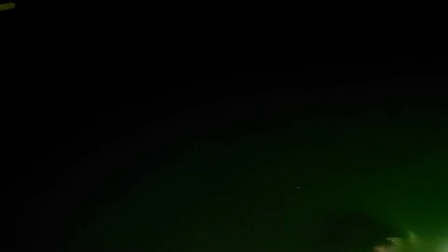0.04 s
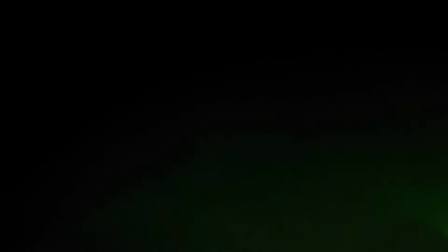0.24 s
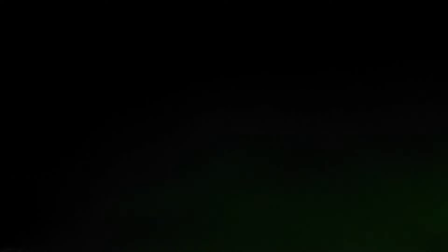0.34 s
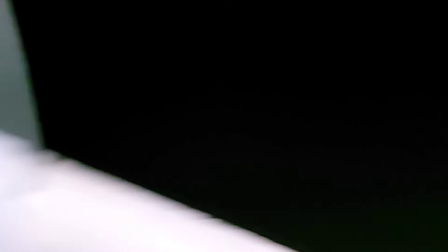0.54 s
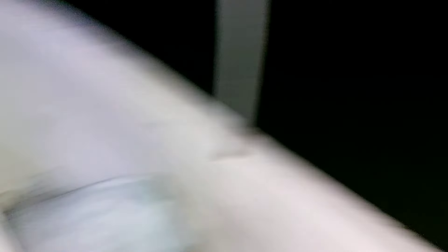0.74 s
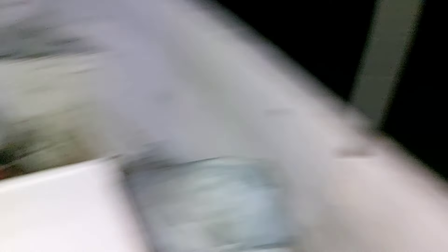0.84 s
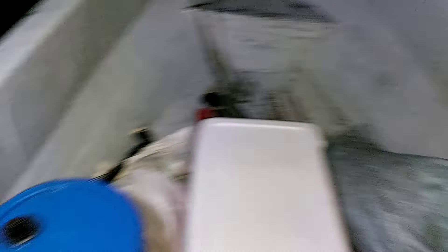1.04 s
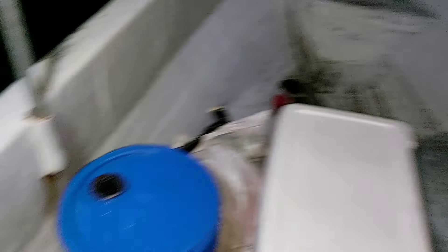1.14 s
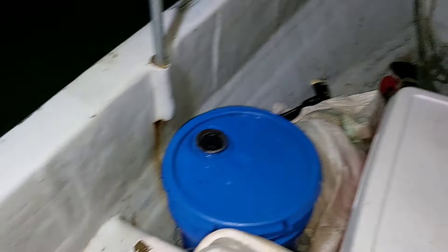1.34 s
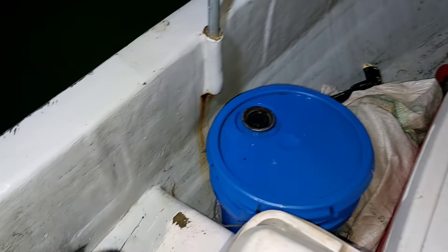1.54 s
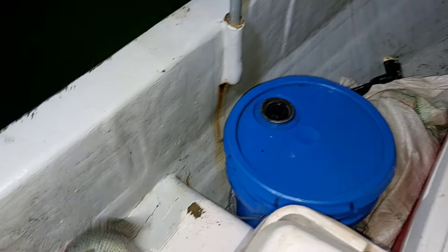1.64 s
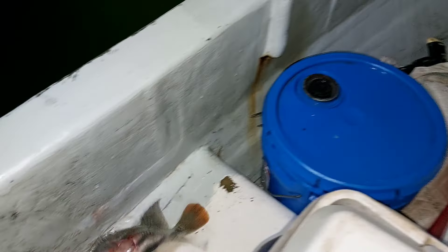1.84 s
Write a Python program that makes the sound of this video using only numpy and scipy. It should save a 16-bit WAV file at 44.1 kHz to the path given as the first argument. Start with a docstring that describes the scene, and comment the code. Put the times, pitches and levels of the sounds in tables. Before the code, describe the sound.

Close, dry sound of a fish thrashing in a small hollow boat at night; sharp wet smacks, heavy low knocks and tiny pops come first, then softer scattered flops with short resonant tails.

```python
"""On the floor of a small fibreglass boat at night, a freshly caught fish flops under a faint bed of air noise.
Wet slaps and scrapes are shaped noise: a crackle, a snap and a short tail off the hard sides of the boat.
Heavier blows excite decaying hull modes; low bands of noise give the rumble of the flexing deck.
Air trapped under the wet skin pops as brief damped sine tones."""
import sys
import numpy as np
from scipy import signal
from scipy.fft import rfft, irfft
from scipy.io import wavfile
from scipy.ndimage import uniform_filter1d, minimum_filter1d

SR = 44100
rng = np.random.default_rng(int(sys.argv[2]) if len(sys.argv) > 2 else 0)


def to_wav(s):
    """Save 16-bit WAV."""
    ch = np.atleast_2d(s).T  # columns
    pcm = np.round(np.clip(ch, -1, 1) * 32767)  # PCM
    wavfile.write(sys.argv[1], SR, pcm.astype(np.int16))


N = 83790  # length in samples


def amp(db):
    """Decibel law: converts a level to an amplitude gain."""
    return 10 ** (np.asarray(db) / 20)


def unit(x):
    """Normalisation: scales to a root-mean-square value of 1."""
    return x / np.sqrt(np.mean(x ** 2) + 1e-20)


def read(points, hz):
    """Interpolation: reads (frequency, value) points along a log-frequency axis."""
    point_hz, value = np.transpose(list(points))
    return np.interp(np.log(hz + 1), np.log(point_hz + 1), value)


def add(mix, start_s, sound):
    """Superposition: adds a stereo sound to the mix at its start time."""
    part = mix[:, max(round(start_s * SR), 0):][:, :sound.shape[1]]
    part += sound[:, :part.shape[1]]


def noise(points, likeness, size, tone=((100, 0), (1000, 0))):
    """Partial correlation: stereo noise of a given spectrum, set to rms 1 and then shaded by tone (Hz, dB)."""
    first, second = rng.standard_normal((2, size))
    likeness = np.clip(likeness, -1, 1)
    hz = np.fft.rfftfreq(size, 1 / SR)
    gain = unit(amp(read(points, hz))) * amp(read(tone, hz))
    partly_alike = likeness * first + np.sqrt(1 - likeness ** 2) * second
    return irfft(rfft([first, partly_alike]) * gain, size)


# spectrum of the quiet night on the water: pitch_hz [Hz], level_db [relative dB per Hz]
AIR_SPECTRUM = [(20, -5), (70, 13.5), (200, 8.5), (400, 5), (800, -7.5), (2000, -16.5), (12000, -22.5),
                (16000, -18)]
AIR_DB = -51


def night_air():
    """Broadband noise: a steady, partly correlated background."""
    return amp(AIR_DB) * noise(AIR_SPECTRUM, 0.62, N)


# the whole weight of the fish lands and the deck flexes: start_s [s], level_db [relative dB]
DECK_FLEXES = [(0.271, -26), (0.354, -26.5), (0.656, -31), (.945, -29.5), (1.2, -37), (1.562, -40)]
FLEX_RISE_S, FLEX_T60_S, FLEX_HZ, FLEX_WIDTH_HZ = 0.031, 0.76, 84.2, 15.6


def flex(level_db):
    """Narrow-band excitation: the deck gives under the fish with a dull, decaying rumble."""
    t = np.arange(SR // 2) / SR
    hz = np.fft.rfftfreq(len(t), 1 / SR)
    band = np.exp(-.5 * ((hz - FLEX_HZ) / FLEX_WIDTH_HZ) ** 2)
    rumble = unit(irfft(rfft(rng.standard_normal(len(t))) * band, len(t)))
    envelope = np.minimum(t / FLEX_RISE_S, 1) * amp(level_db - 60 * t / FLEX_T60_S)
    return np.tile(rumble * envelope, (2, 1))


# blows on the hull, with the excitation of its modes by frequency region:
# start_s [s], near_120_hz_db, near_250_hz_db, near_450_hz_db, near_800_hz_db [relative dB]
HULL_BLOWS = [ (0.178, -42, -39, -30.5, -63), (.207, -48, -32.5, -15, -10), (0.245, -18, -36, -26, -14),
              (0.277, -21, -29.5, -17, -15), (0.343, -8, -10.5, 7, -9), (0.364, -7, -23, -3.5, -28.5),
              (.386, -15, -14, -34, -52), (0.422, -13, -18, -66, -68), (.533, -54, -31, -23.5, -8),
              (0.573, -22, -32, -21.5, -61), (0.627, 5, -19.5, -21, -13), (.668, -8, -23, -30, -17),
              (0.704, -18, -28.5, -21.5, -44), (0.774, -19, -29, -32, -45), (.820, -31, -32, -16, -15),
              (0.9484, -15.5, -18.5, -20.5, -15), (1.036, -16.5, -14, -3.5, -32),
              (1.051, -27, -21, -13.5, -47), (1.201, -18, -23, -44, -31), (1.2654, -13, -20, -65, -25),
              (1.327, -69, -25, -24.5, -40), (1.409, -29, -36, -25.5, -40), (1.546, -20.5, -27.5, -72, -45),
              (1.567, -19, -30.5, -17, -21), (1.821, -28, -25.5, -20.5, -27.5)]
# nominal modes of the hull: pitch_hz [Hz], level_db [relative dB], t60_s [s]
HULL_MODES = [(130.2, 0.5, 0.17), (164.4, 2.5, 0.05), (235.6, 0, 0.36), (257.7, 12, 0.14), (321.4, 0, 0.21),
              (349.6, 5.5, 0.14), (373, 2, 0.13), (459.5, -2, 0.087), (677, -3, 0.086), (755, -21.5, 0.22),
              (885, -12.5, 0.097)]
HULL_DB, RISE_CYCLES = -5, 0.7
HULL_SPREAD_RAD = 0.52  # standard deviation of the phase difference between the channels
DETUNE = 0.0052  # the fish loads the panels, so each blow shifts the modes by about this share
PANELS_DB, PANELS_T60_S, PANELS_RISE_S = -4, 0.18, .007


def thump(db_120, db_250, db_450, db_800):
    """Modal superposition: where the fish lands decides which hull modes answer; low modes build up slowest."""
    t = np.arange(SR * 3 // 4) / SR
    tone = [(120, db_120), (250, db_250), (450, db_450), (800, db_800)]
    modes = np.zeros((2, len(t)))
    for hz, mode_db, t60_s in HULL_MODES:
        phase = HULL_SPREAD_RAD * rng.standard_normal() * np.array([[-.5], [.5]])
        rise = np.minimum(t * hz / RISE_CYCLES, 1)
        envelope = rise * amp(HULL_DB + mode_db + read(tone, hz) - 60 * t / t60_s)
        shifted_hz = hz * (1 + DETUNE * rng.standard_normal())
        modes += envelope * np.sin(2 * np.pi * shifted_hz * t + phase)
    # noise stands for the many small panel modes between the main ones
    panel_spectrum = [(50, -53), (95, -4), (165, 7.5), (500, -11.5), (900, -38.0), (1500, -47), (4000, -61)]
    panels = noise(panel_spectrum, 0.97, len(t), tone)
    panel_envelope = amp(PANELS_DB - 60 * t / PANELS_T60_S) * np.minimum(t / PANELS_RISE_S, 1)
    return modes + panels * panel_envelope


# pops of air trapped under the wet skin: start_s [s], pitch_hz [Hz], level_db [relative dB]
AIR_POPS = [(.2066, 2200, -15.5), (.572, 2010, -12), (.5715, 5900, -16), (.8148, 3480, -18.5),
            (.9515, 2440, -18)]
POP_T60_S, POP_RISE_S, POP_SPREAD_RAD = 0.034, 0.0026, 1  # spread: phase difference between the channels


def pop(pitch_hz, level_db):
    """Damped oscillation: a pocket of air rings briefly as it is squeezed out."""
    t = np.arange(SR // 4) / SR
    phase = POP_SPREAD_RAD * np.array([[.5], [-.5]])
    envelope = np.minimum(t / POP_RISE_S, 1) * amp(level_db - 60 * t / POP_T60_S)
    return envelope * np.sin(2 * np.pi * pitch_hz * t + phase)


POCKET_DB, POCKET_WIDTH_HZ = 2, 260  # strength and spacing of the random ripple


def pockets(sound):
    """Spectral coloration: air pockets under the fish give each slap its own random peaks and dips."""
    size = sound.shape[1]
    hz = np.fft.rfftfreq(size, 1 / SR)
    steps = np.clip(rng.standard_normal(len(hz)), -2, 2)
    ripple = np.interp(hz / POCKET_WIDTH_HZ, np.arange(len(hz)), steps)
    return irfft(rfft(sound) * unit(amp(POCKET_DB * ripple)), size)


# wet slaps and scrapes: start_s [s], swell_s [s], t60_s [s],
# at_800_hz_db, at_2000_hz_db, at_5000_hz_db, at_12000_hz_db [relative dB]
WET_SLAPS = [ (.165, 0.041, 0.97, -31, -38, -45, -40), (0.205, 0.0019, 0.13, -28, -19, -31.5, -19.5),
             (0.2443, 0.0014, 0.049, -13, -19, -20.5, -14), (0.279, 0.001, 0.13, -19.5, -28.5, -29, -21),
             (0.304, 0.0052, 0.27, -22.5, -34, -26.5, -26.5),
             (0.342, 0.00079, 0.047, -8, -16.5, -29.5, -24.5), (0.386, 0.0098, 1, -39, -44, -43, -46),
             (0.5046, 0.0013, 0.082, -41.5, -38.5, -62, -40),
             (0.53, 0.0052, 0.38, -25, -36.5, -40.5, -32.5), (.571, 0.0015, 0.067, -47.5, -20, -19, -18.5),
             (.624, 0.0061, 0.087, -13, -19.5, -27.5, -16.5), (0.679, 0.0038, 0.09, -17, -30, -93, -110),
             (.7042, 0.00017, 0.057, -17, -24.5, -21, -14.5), (0.776, 0.0012, 0.19, -34, -40, -44, -39.5),
             (0.8103, 0.0017, 0.021, -32, -30, -16.5, -29), (0.8143, .0005, 0.018, -50, -27, -20, -12),
             (0.8187, 0.00059, 0.04, -35, -18, -19, -16), (.8226, .0005, 0.058, -19, -25.5, -24, -25),
             (0.901, 0.011, 0.085, -25.5, -45, -46, -38), (0.9274, 0.001, 0.11, -21, -27, -26.5, -28.5),
             (0.951, .0013, 0.085, -14.5, -15.5, -22.5, -28),
             (.967, 0.00097, 0.31, -18.5, -32.5, -34.5, -37),
             (1.035, 0.0025, 0.94, -43, -38.5, -44.5, -41.5), (1.193, 0.0016, 0.059, -34, -39, -51, -37),
             (1.211, 0.0016, 0.12, -27, -34.5, -33, -32), (1.293, 0.00094, 0.13, -29, -43, -41, -38),
             (1.322, 0.00047, 0.18, -29.5, -39.5, -41.5, -34), (1.384, 0.013, 0.16, -38.5, -42.5, -45, -34),
             (1.515, 0.003, 0.032, -50, -42, -46, -37.5), (1.549, 0.00097, 0.11, -39, -34, -43.5, -43),
             (1.5678, 0.00079, 0.13, -23.5, -34.5, -31, -28.5),
             (1.725, 0.00043, 0.2, -40.5, -37.5, -44.5, -38.5), (1.808, 0.0013, 0.41, -55, -47, -52.5, -37),
             (1.821, 0.00089, 0.12, -24.5, -40, -34, -71), (1.857, 0.008, 0.096, -29, -39, -40, -30)]
# colour shared by all slaps: pitch_hz [Hz], level_db [relative dB]
SLAP_SPECTRUM = [(150, 12), (400, 10), (800, 7), (1400, 5), (2100, 7.5), (2900, 4.5), (4200, 6),
                 (5600, 0.5), (7600, 2.5), (8900, -3), (10300, -3), (12300, -0.5), (14500, -8.5),
                 (16000, -11)]
SLAP_DB, SLAP_LIKENESS = 3, 0.25  # likeness: correlation between the channels
CRACKLE_DB, GRAIN_S = 1.5, .0006
CRACK_DB, CRACK_S, SHARP_SWELL_S = -2.5, 0.0014, .0025  # slower swells than the last weaken the snap most
TAIL_DB, TAIL_T60_S, TAIL_RISE_S = -7, 0.14, 0.011  # short tail between the sides of the boat
RIGHT_LAG = 7  # samples by which slaps reach the right channel later


def slap(swell_s, t60_s, db_800, db_2000, db_5000, db_12000):
    """Impact noise: tiny wet contacts swell, snap and die away; the boat adds a reverberant tail."""
    t = np.arange(SR // 2) / SR
    smooth = np.minimum(t / swell_s, 1) * amp(-60 * np.maximum(t - swell_s, 0) / t60_s)
    size = np.sqrt(np.mean(smooth ** 2))
    contacts = np.clip(rng.standard_normal(len(t)), -2, 2)
    grain = np.interp(t / GRAIN_S, np.arange(len(t)), contacts)
    crackle = size * unit(smooth * amp(CRACKLE_DB * grain))
    # the skin closes on the deck at the end of the swell
    sharpness = 1 / (1 + (swell_s / SHARP_SWELL_S) ** 2)
    snap = amp(CRACK_DB) * sharpness * np.exp(-((t - swell_s) / CRACK_S) ** 2)
    tail_shape = np.minimum(t / (swell_s + TAIL_RISE_S), 1) * amp(-60 * t / TAIL_T60_S)
    tail = size * amp(TAIL_DB) * unit(tail_shape)
    envelope = np.sqrt(crackle ** 2 + snap ** 2 + tail ** 2)  # powers add
    tone = [(800, db_800), (2000, db_2000), (5000, db_5000), (12000, db_12000)]
    wet_noise = pockets(noise(SLAP_SPECTRUM, SLAP_LIKENESS, len(t), tone))
    left, right = wet_noise * envelope
    late_right = np.pad(right, (RIGHT_LAG, 0))[:len(t)]
    return amp(SLAP_DB) * np.array([left, late_right])


LOW_CUT_HZ = 110  # high-pass corner for the slaps, pops and hull thumps


def scene():
    """Linear superposition: night air, flexing deck, hull thumps, pops and slaps are summed."""
    fish, deck = np.zeros((2, 2, N))
    for start_s, level_db in DECK_FLEXES:
        add(deck, start_s, flex(level_db))
    for start_s, *blow in HULL_BLOWS:
        add(fish, start_s, thump(*blow))
    for start_s, *bubble in AIR_POPS:
        add(fish, start_s, pop(*bubble))
    for start_s, *contact in WET_SLAPS:
        add(fish, start_s, slap(*contact))
    low_cut = signal.butter(2, LOW_CUT_HZ, "high", fs=SR, output="sos")
    return night_air() + deck + signal.sosfilt(low_cut, fish)


LIMIT_SAMPLES, CUT_HZ = 300, 15900  # limiter window; upper band limit


def limited(x):
    """Peak limiting: a smoothed gain reduction holds peaks above full scale down."""
    gain = minimum_filter1d(1 / np.maximum(abs(x).max(0), 1), LIMIT_SAMPLES)
    return x * uniform_filter1d(gain, LIMIT_SAMPLES)


def record(dry):
    """Linear filtering and limiting: the left is duller at the very top; peaks, then bandwidth, are limited."""
    hz = np.fft.rfftfreq(N, 1 / SR)
    # left-minus-right level (Hz, dB), shared equally between the channels
    tilt_db = read([(200, -.4), (1000, -1), (5000, .7), (9000, 1), (13000, -3)], hz)
    heard = irfft(rfft(dry) * amp(np.array([[.5], [-.5]]) * tilt_db), N)
    band_limit = signal.firwin(255, CUT_HZ, window=("kaiser", 8), fs=SR)
    return signal.oaconvolve(limited(heard), band_limit[None], "same")


dry = scene()
out = record(dry)
to_wav(out)
```